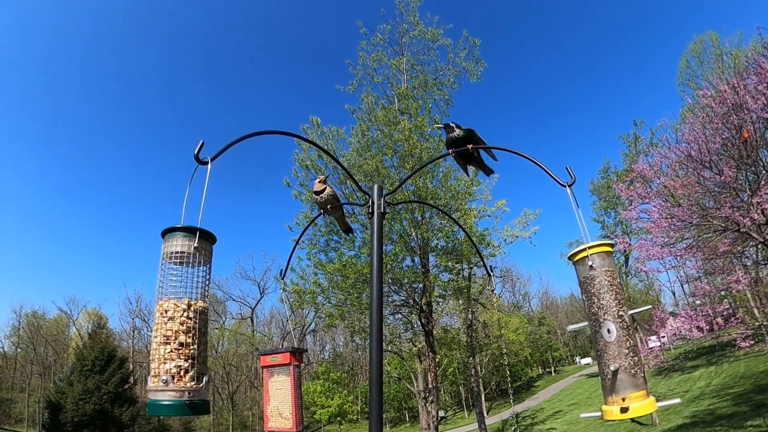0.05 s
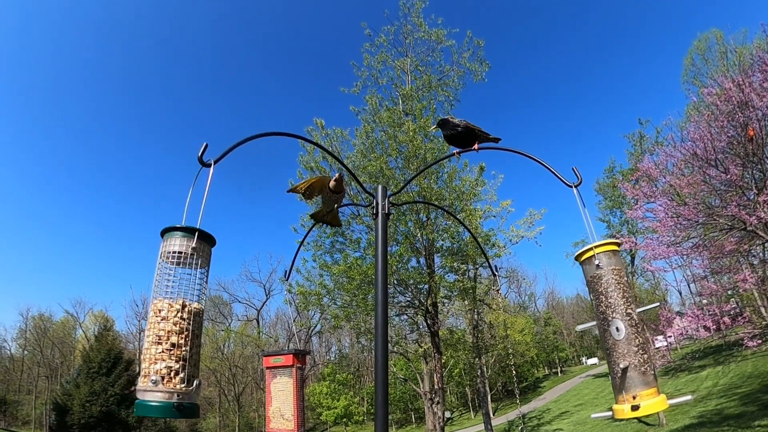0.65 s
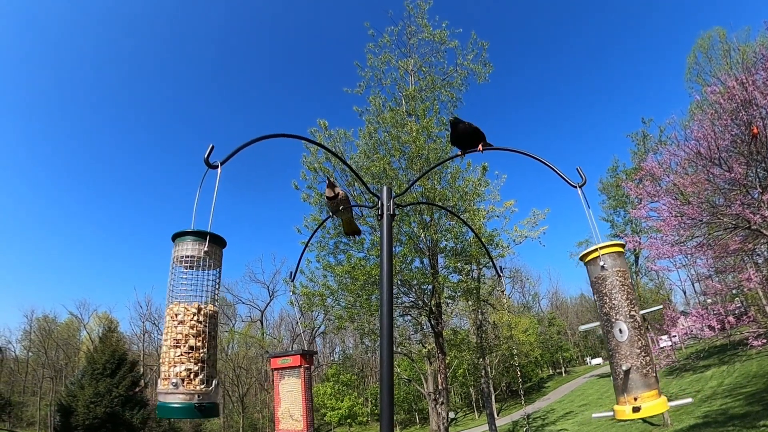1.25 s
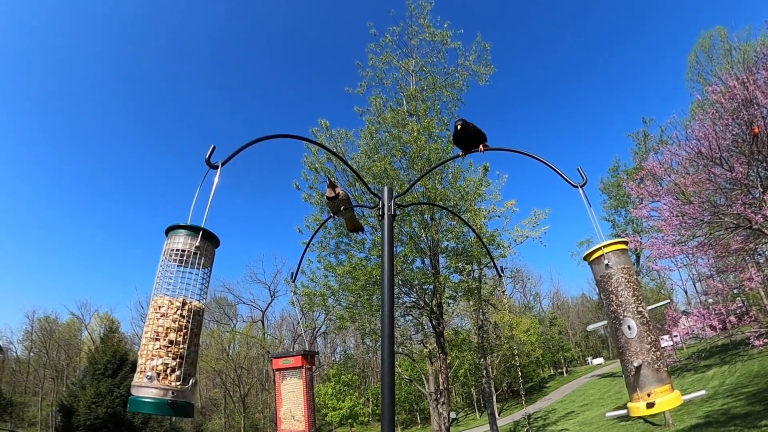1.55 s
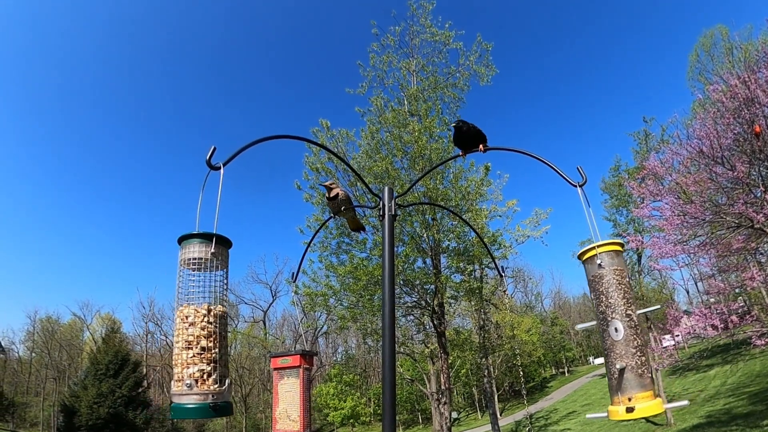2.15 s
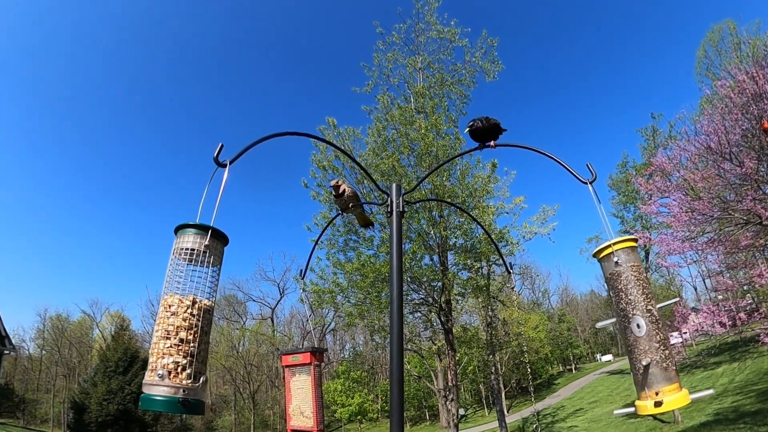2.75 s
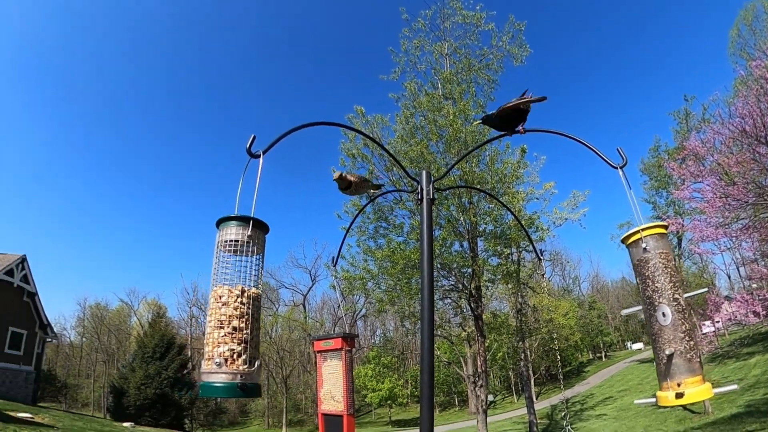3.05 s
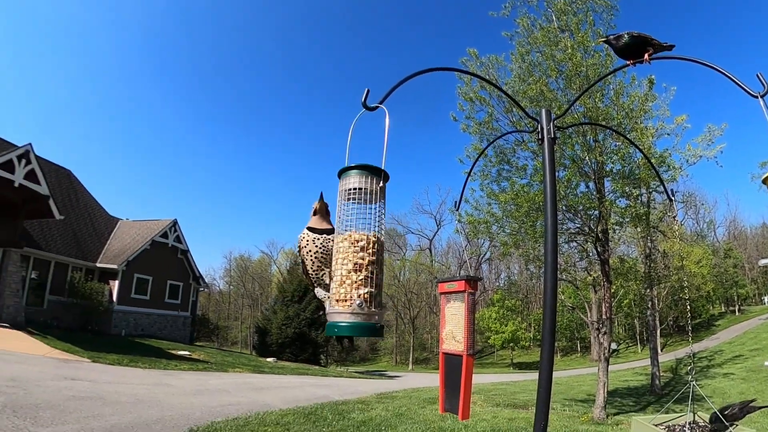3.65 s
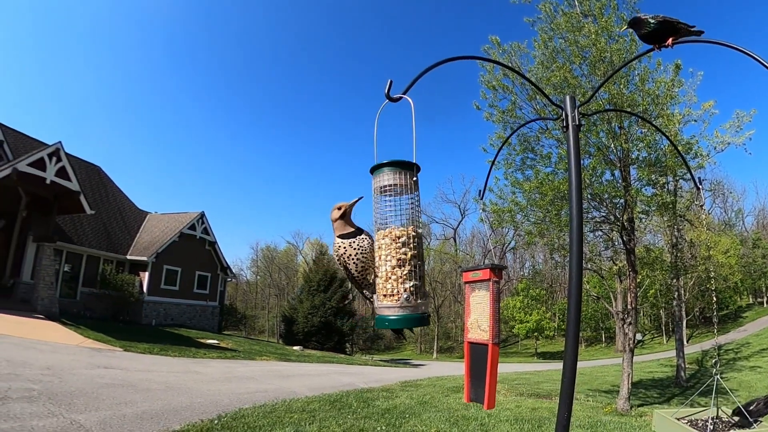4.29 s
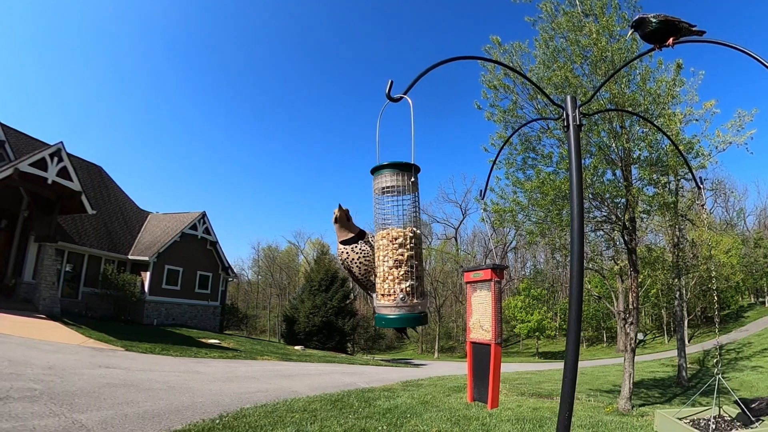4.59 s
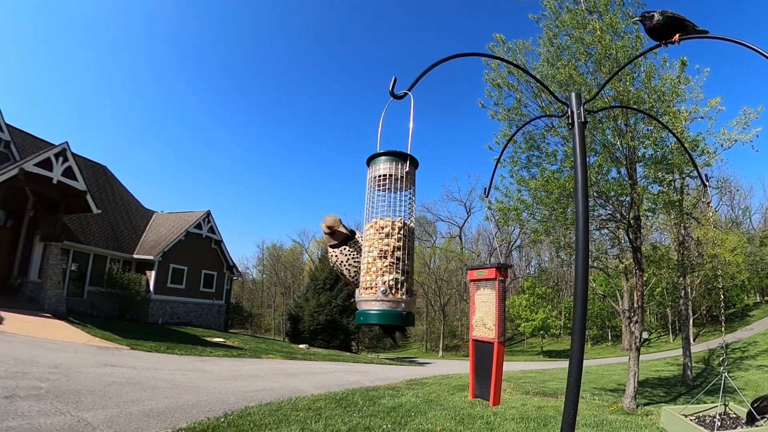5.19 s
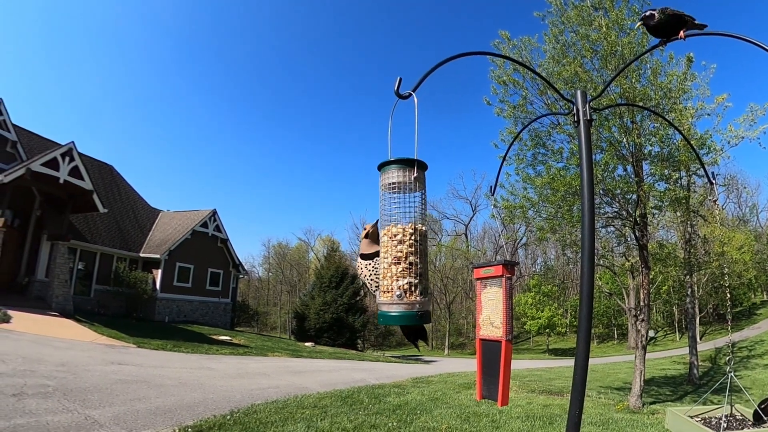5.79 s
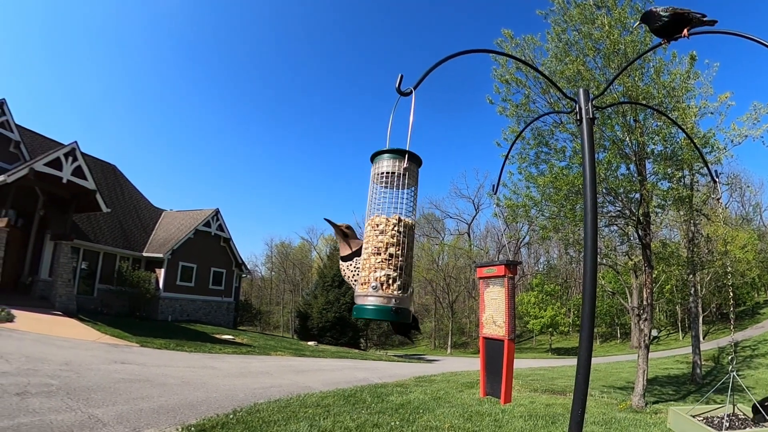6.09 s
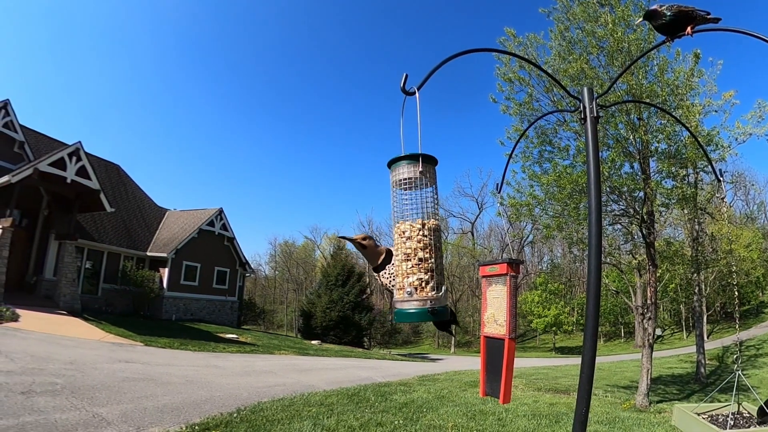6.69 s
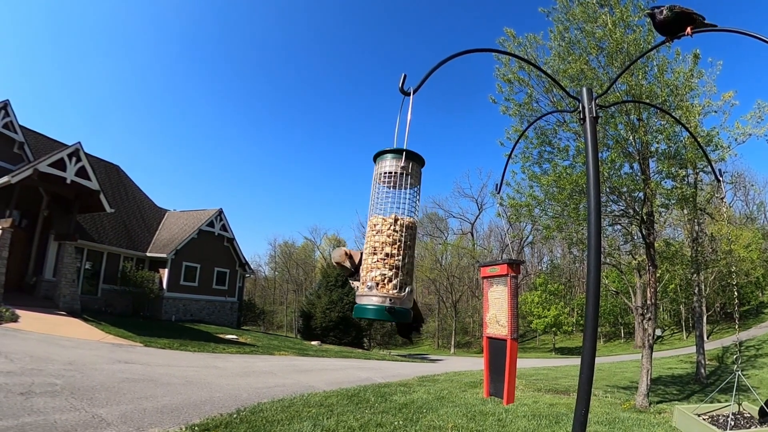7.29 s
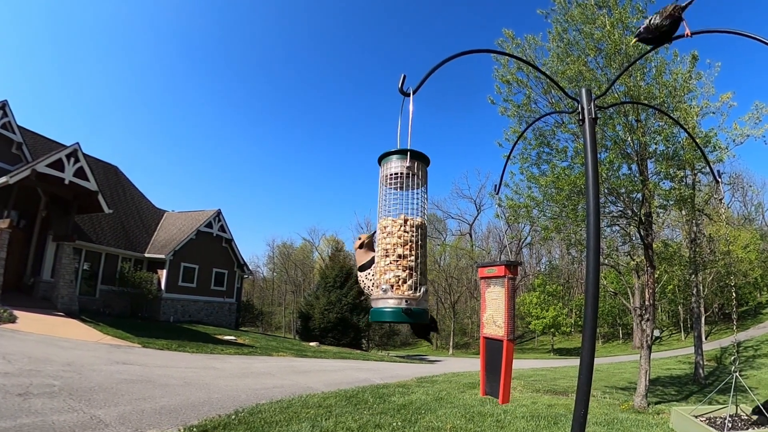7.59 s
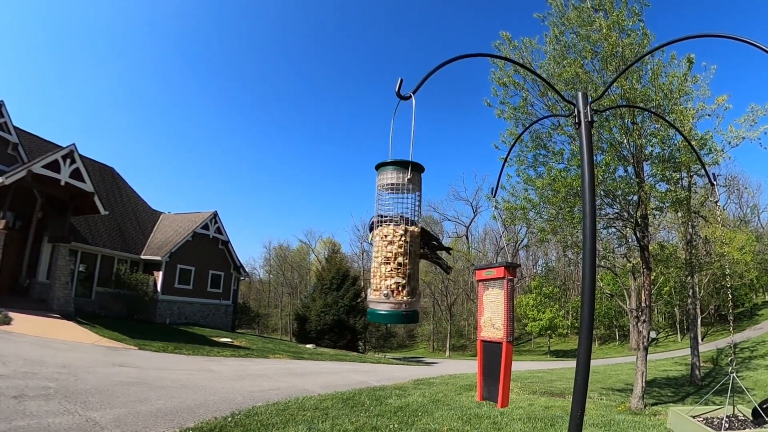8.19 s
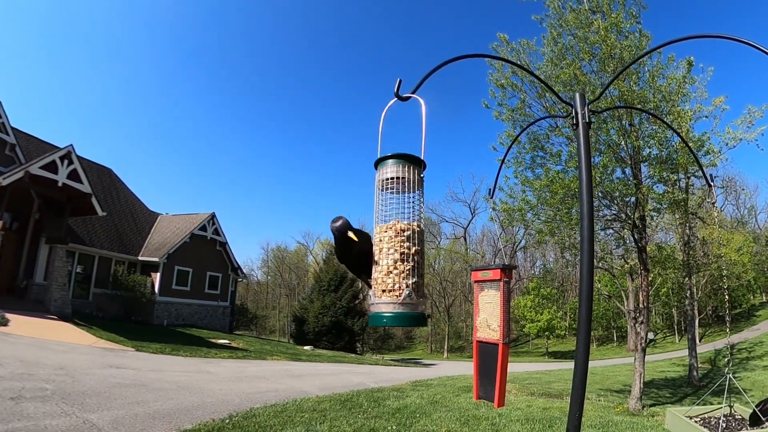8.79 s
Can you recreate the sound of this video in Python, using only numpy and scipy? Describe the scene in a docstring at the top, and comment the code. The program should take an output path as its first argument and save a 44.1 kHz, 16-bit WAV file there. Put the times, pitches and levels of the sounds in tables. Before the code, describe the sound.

A small songbird sings two quick phrases in a garden, while close wings flutter and claws tick on a feeder.

```python
"""A garden bird feeder on a spring day. A small songbird whistles two phrases of slurs, buzzes and
trills with both sides of its syrinx; they echo off house and trees. A starling lands on the steel
hanger, ringing it, and squawks in rough harmonics. Wings swish and push air close by; claws and beaks
tick on the feeder. Other birds call farther off, over a distant engine hum and light air."""
import sys
import numpy as np
from scipy import signal
from scipy.fft import rfft, irfft
from scipy.io import wavfile

SR = 44100
rng = np.random.default_rng(int(sys.argv[2]) if len(sys.argv) > 2 else 0)


def materialize(psi):
    """Save the field psi as 16-bit PCM at rate SR to the path in sys.argv[1].

    A 1-D psi becomes a single channel; in a 2-D psi each row is a channel.
    """
    bounded = np.clip(np.atleast_2d(psi).T, -1, 1)
    quanta = np.round(bounded * 32767).astype(np.int16)
    wavfile.write(sys.argv[1], SR, quanta)


N = 389844
TIME_S = np.arange(N) / SR
CUTOFF_HZ = 15300

# Levels in the tables are relative; the functions set the final gain.
# noise spectra: freq_hz, density_db
AIR_SPECTRUM = [(15, -12.5), (25, -9), (48, 0.5), (92, -8.5), (180, 2), (252, -6), (337, -8.5), (371, -9.5),
                (587, -15), (927, -25.5), (1180, -23.5), (3090, -34), (5130, -35.5), (7910, -32),
                (10300, -46.5), (17400, -120)]
DRAUGHT_SPECTRUM = [(8.8, -34.5), (15, 6.5), (42, -7), (76, -6.5), (103, -22.5), (162, -14), (258, -35),
                    (616, -56.5), (700, -53), (910, -74.5), (1540, -120)]
FEATHER_SPECTRUM = [(150, 6.5), (350, 4), (700, -4), (1400, 1.5), (2500, -2), (5000, -6), (8000, -7.5),
                    (10000, -18), (14000, -39)]
THUD_SPECTRUM = [(40, -11), (90, 4), (200, -6.5), (450, -17.5), (1000, -32), (4000, -82)]
# level curves: time_s, level_db
BREEZE_LEVEL = [(3.8, -74.5), (6.26, -56), (7.35, -41.5), (7.44, -45.5), (7.8, -46.5)]
ENGINE_FIRING_LEVEL = [(3.8, -61), (4.92, -55), (5.42, -60.5), (5.5, -53), (6.11, -46), (7.0, -51.5),
                       (7.08, -46), (7.68, -60.5), (7.7, -57)]
ENGINE_OCTAVE_LEVEL = [(3.8, -76), (4.5, -62.5), (5, -56.5), (5.4, -64), (6.1, -70.5), (6.6, -65.5),
                       (7.35, -56.5), (7.6, -61), (7.8, -79)]
CHATTER_LEVEL = [(0, -78), (.6, -67), (1.1, -62.5), (1.6, -91), (3, -68.5), (4.5, -65), (5.3, -61.5),
                 (6.2, -69), (6.9, -77.5), (8.84, -77)]
# envelope of the garden's scattered echoes: delay_s, level_db
ECHO_ENVELOPE = [(.003, 13), (.012, 1), (.06, -12.5), (.088, 0), (.11, -9), (.15, -14), (.35, -27),
                 (.8, -59)]

# syllable paths by name, then those of the syrinx's other side: time_s, pitch_hz, level_db
SYLLABLES = { "tink": [(0, 5040, -7), (.006, 5120, 1), (.016, 4300, -12.5)], "dip": [(0, 3110, -1.5),
             (.011, 2722, 8), (.025, 2450, 1), (.04, 2334, 3)], "slur": [(0, 5230, -43), (.013, 5450, -25),
             (.022, 4640, -8), (.032, 3743, -4), (.047, 3350, -9), (.063, 3140, -21.5)],
             "buzz": [(0, 5346, -18), (.012, 5486, -8.5), (.032, 7230, -3.5), (.048, 6206, -3),
             (.063, 4970, 1), (.08, 4277, -1.5), (.095, 3850, -8), (.109, 3773, -6.5), (.116, 3800, -56)],
             "cut buzz": [(0, 5600, -14), (.012, 5530, -2), (.028, 6930, 0.5), (.044, 6730, 2),
             (.06, 5000, 2), (.074, 4420, -0.5), (.084, 3167, -19)], "lift": [(0, 3815, -17.5),
             (.012, 4007, -6.5), (.028, 4353, -3), (.04, 4574, 1), (.048, 4650, -6.5), (.053, 4380, -19)],
             "low note": [(0, 2834, -10.5), (.012, 3026, -9.5), (.034, 2980, -4.5), (.043, 2820, -7)],
             "swell": [(0, 2806, -21.5), (.012, 3574, -8.5), (.025, 4014, -3), (.045, 4330, -1),
             (.075, 4450, -3.5), (.082, 4256, -12.5), (.088, 4480, -13.5)], "drop": [(0, 7700, -21.5),
             (.002, 8440, 2), (.006, 7190, -6), (.012, 6160, 1.5), (.022, 5710, 1.5), (.032, 5560, -4.5),
             (.046, 4800, -20)], "sweep": [(0, 2570, -35.5), (.008, 3820, -13.5), (.014, 4947, -3),
             (.028, 6050, -5.5), (.04, 6950, -5), (.047, 7020, -9.5), (.057, 8500, -17)],
             "fall": [(0, 5736, -5), (.008, 4900, 1), (.025, 4250, -1.5), (.04, 3650, -2.5),
             (.056, 2964, -12)], "twang": [(0, 5120, -24), (.005, 6650, -16), (.008, 6570, -2.5),
             (.014, 7130, -13), (.022, 6178, -4), (.034, 6066, -5), (.045, 5780, -17.5)],
             "chip": [(0, 2360, -28), (.006, 4025, 0.5), (.01, 5190, -7), (.015, 4380, 0.5),
             (.024, 4100, 0.5), (.031, 3640, -21)], "far rise": [(0, 3310, -8.5), (.012, 4040, -6),
             (.027, 5100, -7)], "far fall": [(0, 4660, -17.5), (.02, 3787, -6.5), (.045, 3100, -2)],
             "far tick": [(0, 4564, 0.5), (.014, 3480, 2), (.03, 2850, 2.5)]}
SECOND_VOICE = { "slur": [(0, 3840, -28), (.014, 3830, -20), (.026, 3750, -11.5)],
                "chip": [(-.002, 3330, -27), (.002, 4790, -7), (.005, 5800, -23)],
                "sweep": [(0, 4680, -12.5), (.007, 7260, -18.5), (.012, 9500, -22)],
                "fall": [(.015, 3315, -19.5), (.035, 3130, -7.5), (.05, 2750, -12), (.059, 2500, -32.5)]}
# fast pitch warble by syllable: time_s, depth_hz, rate_hz
WARBLES = { "buzz": [(0, 981, 116.3), (.008, 1250, 105.2), (.02, 774, 131.2), (.035, 550, 168.9),
           (.07, 380, 186), (.11, 240, 190.4)], "cut buzz": [(0, 1253, 112), (.008, 1400, 106),
           (.02, 800, 135), (.045, 550, 185), (.06, 50, 183.2)], "twang": [(0, 1300, 59), (.006, 1510, 105),
           (.016, 1390, 111.4), (.023, 400, 125.6), (.032, 79.6, 150)]}
# runs of one syllable: start_s, syllable, repeats, period_s, first_db, settled_db, length_ratio
FAR_SONG = [ (.966, "far rise", 5, .0705, -52.5, -52, .9), (1.078, "far rise", 4, .0715, -56, -57.5, .9),
            (1.376, "far rise", 1, 0, -58.5, -59, 0.85), (5.775, "far fall", 3, .16, -67, -53, .86),
            (6.86, "far fall", 1, 0.0037, -69, -70, 0.8)]
FAR_TRILL = [(4.531, "far tick", 15, .0686, -65, -64.5, 0.88)]
NEAR_SONG = [ (2.055, "tink", 1, 0, -50, -51, .95), (2.06, "dip", 1, 0, -60.5, -57, 0.96),
             (2.168, "slur", 2, .141, -36, -32, .97), (2.449, "buzz", 3, .228, -38, -29.5, 1),
             (2.587, "lift", 3, .23, -35, -27.5, .95), (3.144, "cut buzz", 1, 0, -32.5, -28, 1.045),
             (3.22, "low note", 3, .246, -41.5, -37, .9), (3.297, "swell", 2, .246, -28, -29.5, 1.074),
             (3.433, "drop", 2, .251, -36.5, -32, 0.94), (3.791, "sweep", 5, .0897, -31.5, -30, 1),
             (4.29, "fall", 2, .113, -40, -41, 1.02), (6.897, "tink", 1, 0, -61.5, -60.5, 0.99),
             (6.903, "dip", 1, 0, -63.5, -63, .855), (7.011, "slur", 2, .142, -39, -35, 0.98),
             (7.305, "twang", 5, .1358, -39, -29, 1.06), (7.374, "chip", 5, .1361, -36, -32, 0.85),
             (8.018, "fall", 3, .1072, -32.5, -37, 1.05), (8.384, "buzz", 2, .224, -33, -30.5, 1.033),
             (8.523, "lift", 2, .24, -32, -32, 0.98)]
# thin far whistles, one path each: time_s, pitch_hz, level_db
FAR_WHISTLES = [
    [(4.31, 7600, -57), (4.6, 7620, -61), (4.88, 7640, -59.5)],
    [(4.88, 2000, -72.5), (5, 2133, -67), (5.08, 2177, -66), (5.16, 2105, -74.5), (5.35, 2150, -83)],
    [(5.17, 9850, -76), (5.5, 9600, -71), (5.8, 9450, -73)],
    [(5.775, 6980, -74), (5.81, 6440, -67), (5.845, 6800, -72.5), (5.875, 6490, -74), (5.91, 6800, -70)],
    [(6.12, 6620, -67), (6.16, 6370, -56), (6.25, 6300, -65.5), (6.31, 6470, -78)],
    [(6.33, 5870, -71), (6.42, 5580, -73.5), (6.5, 5570, -72)],
    [(4.865, 2975, -63), (4.89, 3310, -55), (4.92, 3400, -63)],
    [(6.68, 3090, -83), (6.72, 3310, -57), (6.76, 3400, -88.5)],
]
# husky far calls: start_s, length_s, centre_hz, width_hz, level_db
HUSKY_CALLS = [(4.463, 0.41, 6090, 1800, -69.5), (6.096, 0.18, 6500, 1200, -64.5),
               (6.325, 0.18, 5530, 900, -68.5), (6.57, 0.11, 6220, 1410, -68)]
# paths of the starling's voice and whistle: time_s, pitch_hz, level_db
SQUAWK_VOICE = [(.726, 509, -48.5), (.745, 681, -50), (0.779, 723, -48.5), (.82, 762, -46.5),
                (0.864, 850, -40.5), (0.897, 897, -41.5), (0.915, 916, -47.5), (0.933, 886, -38)]
SQUAWK_WHISTLE = [(0.725, 5000, -42.5), (0.751, 5510, -48.5), (0.781, 6000, -44), (0.819, 6340, -44.5),
                  (.865, 6940, -49.5), (0.904, 7320, -48)]
# harmonics of that voice: multiple, level_db
SQUAWK_HARMONICS = [(3, -16), (4, -12), (5, -31), (6, 0.5), (7, -9.5), (8, -34), (9, -27.5), (10, -30)]

# beak among the nuts: start_s, length_s, level_db
RUMMAGES = [(0.502, 0.3, -75), (5.078, 0.082, -68), (5.532, 0.058, -56.5), (5.65, 0.1, -67),
            (6.078, 0.093, -67.5)]
# claws and beaks on the feeder: start_s, crack_db, knock_db
TAPS = [(0.1108, -50, -50), (0.1373, -48, -51.5), (0.177, -47, -56), (0.2224, -53, -52),
        (0.2362, -47.5, -55), (0.5751, -55.5, -63), (0.7068, -52, -73), (1.3249, -65.5, -68),
        (3.6371, -55, -49.5), (4.4825, -55.5, -66), (5.172, -54, -59), (5.548, -34, -60), (5.565, -53, -66),
        (5.5927, -36.5, -43.5), (5.608, -53, -53), (5.9354, -57, -63), (7.9976, -35, -39),
        (8.029, -36, -56), (8.0806, -39, -30), (8.266, -35, -52), (8.4742, -32.5, -44.5),
        (8.5672, -41, -61), (8.7719, -46, -52.5)]
# feeder resonances: freq_hz, width_hz, gain_db
FEEDER_MODES = [(1250, 900, -51), (1900, 450, -33), (3300, 500, 8.5), (5100, 610, 8.5), (5834, 490, 12.5),
                (6800, 470, 11), (8085, 740, 4.5), (10460, 1100, -12)]
# claws on the hanger: start_s, level_db
CLAW_STRIKES = [(0.111, -53), (0.14, -55), (0.178, -54), (0.235, -42.5)]
# steel hanger modes: freq_hz, level_db, nominal_t60_s
HANGER_MODES = [(1480, -23, 0.56), (1665, -14, 0.33), (1820, -14.5, 0.32), (2492, -17, 0.3),
                (2960, -5.5, 0.13), (3060, -4, 0.085), (3400, -8, 0.12), (4005, -13, 0.152),
                (4760, -1, 0.12), (5050, 10, 0.037), (5300, -17, 0.046), (5750, -16, 0.264),
                (7400, -15, 0.088), (8300, -26, 0.092), (9800, -29, 0.087)]
# birds landing, shifting, taking off: start_s, length_s, draught_db, rustle_db
FLURRIES = [(.01, 0.042, -36.5, -58), (0.098, 0.22, -65, -57), (0.538, 0.17, -51, -66),
            (0.74, 0.011, -59, -54), (0.9, 0.036, -73, -63), (3.053, 0.14, -48, -61.5),
            (3.345, 0.13, -36, -55), (3.518, 0.075, -46, -54.5), (5.518, 0.12, -48, -64),
            (7.897, 0.043, -42.5, -60), (7.98, 0.1, -23, -43.5), (8.24, 0.14, -29.5, -52),
            (8.464, 0.088, -30, -47), (8.73, 0.18, -38, -54)]
# close wingbeats: centre_s, swish_db, push_db, thud_db
WINGBEATS = [(0.036, -46.5, -36, -54.5), (1.89, -85, -48, -76), (3.382, -62, -57, -43.5),
             (3.457, -42, -44, -37.5), (3.527, -59, -43, -60), (3.598, -53.5, -38, -55),
             (7.951, -37.5, -34, -41), (8.011, -33, -26, -30), (8.068, -37, -37, -28.5),
             (8.14, -45, -30.5, -43.5), (8.205, -43.5, -22, -55), (8.278, -42, -23, -37),
             (8.318, -62, -21, -36.5), (8.354, -43.5, -24.5, -41), (8.442, -42, -27, -41.5),
             (8.518, -43.5, -25.5, -34.5), (8.71, -39, -21, -45), (8.794, -41.5, -22.5, -44)]


def from_db(db):
    """Decibels to gain."""
    return 10 ** (np.asarray(db) / 20)


def unit_rms(x):
    """Scale to unit power."""
    return x / np.sqrt(np.mean(x ** 2) + 1e-20)


def along(curve, time_s):
    """Each value column of a curve, interpolated at time_s."""
    knots_s, *columns = np.transpose(curve)
    return [np.interp(time_s, knots_s, column) for column in columns]


def add(out, start_s, sound):
    """Mix a sound in at start_s."""
    at = max(0, round(start_s * SR))
    out[at:at + len(sound)] += sound[:max(0, N - at)]


def drift(knots_per_s, size=N):
    """Random wander with a spread of about 1."""
    knots = rng.standard_normal(4096)
    return 1.2 * np.interp(np.arange(size) / SR * knots_per_s % 4095, np.arange(4096), knots)


def noise(spectrum, lowest_hz=12):
    """Unit-power noise with the given spectrum."""
    freq_hz, density_db = np.transpose(spectrum)
    bins_hz = np.maximum(np.fft.rfftfreq(N, 1 / SR), 1)
    gain = from_db(np.interp(np.log(bins_hz), np.log(freq_hz), density_db)) * (bins_hz > lowest_hz)
    return unit_rms(irfft(rfft(rng.standard_normal(N)) * gain, N))


def resonate(x, freq_hz, width_hz):
    """Two-pole resonance, peak gain 1."""
    radius = np.exp(-np.pi * width_hz / SR)
    numerator = np.array([1, 0, -1]) * (1 - radius ** 2) / 2
    denominator = [1, -2 * radius * np.cos(2 * np.pi * freq_hz / SR), radius ** 2]
    return signal.lfilter(numerator, denominator, x + 1e-18)


def band(x, centre_hz, width_hz):
    """Two equal resonances in series, scaled to unit power."""
    return unit_rms(resonate(resonate(x, centre_hz, width_hz), centre_hz, width_hz))


def syrinx(path, warble=None, stretch=1, jitter=.00384, shimmer_db=1.36, harmonics=((1, 0), (2, -54)),
           throat_hz=6845, throat_db_per_octave=61.5, fade_s=.002):
    """One side of a syrinx: a tone along a pitch path. The throat passes high notes poorly."""
    first_s, last_s = path[0][0], path[-1][0]
    time_s = np.arange(first_s, last_s, 1 / (SR * stretch))
    pitch_hz, level_db = along(path, time_s)
    if warble:
        depth_hz, rate_hz = along(warble, time_s)
        pitch_hz -= depth_hz * np.cos(2 * np.pi * np.cumsum(rate_hz) / SR)
    pitch_hz *= 1 + jitter * drift(700, len(time_s))
    level_db -= throat_db_per_octave * np.clip(np.log2(pitch_hz / throat_hz), 0, .25)
    level_db += shimmer_db * drift(300, len(time_s))
    phase = 2 * np.pi * np.cumsum(pitch_hz) / SR
    tone = sum(from_db(db) * np.sin(k * phase) * (k * pitch_hz < CUTOFF_HZ) for k, db in harmonics)
    fade = np.clip(np.minimum(time_s - first_s, last_s - time_s) / fade_s, 0, 1)
    return np.sqrt(2) * tone * fade * from_db(level_db)


def sing(song, slowing_s=0, settling_ratio=.23):
    """Each run repeats a learnt syllable and settles in level; each gap grows by slowing_s."""
    out = np.zeros(N)
    for start_s, name, repeats, period_s, first_db, settled_db, stretch in song:
        for k in range(repeats):
            onset_s = start_s + k * period_s + slowing_s * k * (k - 1) / 2
            gain = from_db(settled_db + (first_db - settled_db) * settling_ratio ** k)
            add(out, onset_s, gain * syrinx(SYLLABLES[name], WARBLES.get(name), stretch))
            if name in SECOND_VOICE:
                path = SECOND_VOICE[name]
                add(out, onset_s + path[0][0] * stretch, gain * syrinx(path, stretch=stretch))
    return out


def through_trees(x, direct_db, scatter_db, scatter_s):
    """Many paths of nearly equal length blur a far call's glides."""
    delay_s = np.arange(SR // 10) / SR
    response = rng.standard_normal(len(delay_s)) * np.exp(-delay_s / scatter_s)
    scattered = signal.fftconvolve(x, response / np.linalg.norm(response))[:N]
    return from_db(direct_db) * x + from_db(scatter_db) * scattered


def garden_echo(x, house_delay_s=.092, house_db=-15):
    """Trunks and leaves scatter a haze of echoes; the house wall returns one distinct repeat."""
    delay_s = np.arange(SR) / SR
    level_db, = along(ECHO_ENVELOPE, delay_s)
    reflections = rng.standard_normal(SR) * (rng.random(SR) < .03)
    response = reflections * from_db(level_db) * (delay_s > .002)
    response /= np.linalg.norm(response)
    add(response, house_delay_s, from_db([house_db]))
    return signal.fftconvolve(x, response)[:N]


def air(level_db=-60):
    """Steady outdoor hush."""
    return from_db(level_db) * noise(AIR_SPECTRUM)


def breeze(lull_db=-64, gust_db=3):
    """Light, uneven air rumbles on the microphone."""
    level_db, = along(BREEZE_LEVEL, TIME_S)
    return from_db(np.maximum(level_db, lull_db) + gust_db * drift(8)) * noise(DRAUGHT_SPECTRUM)


def engine(firing_hz=162.4, wander=.0016, approach_db_per_s=4.5):
    """Distant engine: only the firing tone and its octave carry this far."""
    firing_db, = along(ENGINE_FIRING_LEVEL, TIME_S)
    octave_db, = along(ENGINE_OCTAVE_LEVEL, TIME_S)
    approach_end_s = ENGINE_FIRING_LEVEL[0][0]
    approach = from_db(approach_db_per_s * np.minimum(TIME_S - approach_end_s, 0))
    phase = 2 * np.pi * np.cumsum(firing_hz * (1 + wander * drift(9))) / SR
    hum = from_db(firing_db) * np.sin(phase) + from_db(octave_db) * np.sin(2 * phase)
    return np.sqrt(2) * approach * hum


def wood_chatter(calls_per_s=35, spread_db=8, candidates=500):
    """Many birds deep in the wood: syllables at random moments, each transposed its own way."""
    out = np.zeros(N)
    paths = [SYLLABLES[name] for name in ("far rise", "far fall", "far tick", "lift")]
    for when, kind, pitch, weakness, chance in rng.random((candidates, 5)):
        if chance < calls_per_s * N / SR / candidates:
            start_s = when * N / SR
            path = np.array(paths[int(kind * len(paths))]) * [1, .8 + .4 * pitch, 1]
            level_db, = along(CHATTER_LEVEL, start_s)
            add(out, start_s, from_db(level_db - spread_db * weakness) * syrinx(path))
    return out


def far_birds():
    """Short runs of notes, thin wavering whistles and husky calls of band noise."""
    out = sing(FAR_SONG, slowing_s=.0033)
    for path in FAR_WHISTLES:
        add(out, path[0][0], syrinx(path, jitter=.0074, shimmer_db=3))
    for start_s, length_s, centre_hz, width_hz, level_db in HUSKY_CALLS:
        rasp = band(rng.standard_normal(int(length_s * SR)), centre_hz, width_hz)
        add(out, start_s, from_db(level_db) * rasp * signal.windows.tukey(len(rasp)))
    return out


def rummage(grain_db=5):
    """Dry husks rub under a beak in clumps of tiny bright grains."""
    envelope = np.zeros(N)
    for start_s, length_s, level_db in RUMMAGES:
        add(envelope, start_s, from_db(level_db) * signal.windows.tukey(int(length_s * SR)))
    grains = rng.standard_normal(N) * from_db(grain_db * drift(250))
    return envelope * band(grains, centre_hz=7000, width_hz=3500)


def feeder_taps(crack_s=.0015, rattle_s=.0081, rattle_db=-17, knock_s=.0025, gain_db=4):
    """Each contact drives the feeder's resonances with a crack and a short rattle, over a dull knock."""
    force_envelope, knock_envelope = np.zeros((2, N))
    age_s = np.arange(SR // 10) / SR
    contact = np.exp(-age_s / crack_s) + from_db(rattle_db) * np.exp(-age_s / rattle_s)
    for start_s, crack_db, knock_db in TAPS:
        add(force_envelope, start_s, from_db(crack_db) * contact)
        add(knock_envelope, start_s, from_db(knock_db) * np.exp(-age_s / knock_s))
    force = force_envelope * rng.standard_normal(N)
    ring = sum((-1) ** k * from_db(mode_db) * resonate(force, freq_hz, width_hz)
               for k, (freq_hz, width_hz, mode_db) in enumerate(FEEDER_MODES))
    knock = knock_envelope * unit_rms(resonate(rng.standard_normal(N), freq_hz=590, width_hz=1100))
    return from_db(gain_db) * (ring + knock)


def hanger(gain_db=-2, damping_ratio=.83, spread_db=2):
    """Each claw strike rings the steel bar's modes, each at a random strength."""
    out = np.zeros(N)
    age_s = np.arange(SR) / SR
    freq_hz, mode_db, nominal_t60_s = np.transpose(HANGER_MODES)[:, :, None]
    t60_s = nominal_t60_s / damping_ratio
    modes = from_db(mode_db - 60 * age_s / t60_s) * np.sin(2 * np.pi * freq_hz * age_s)
    for start_s, level_db in CLAW_STRIKES:
        strengths = from_db(level_db + gain_db + spread_db * rng.standard_normal(len(modes)))
        add(out, start_s, strengths @ modes)
    return out


def wings(attack_s=.029, release_s=.034, swish_s=.011, push_s=.011, thud_s=.014, grain_db=3):
    """Each beat swishes, thuds and pushes air; through a flurry feathers rustle and the air eddies."""
    feather_envelope, draught_envelope, thud_envelope, push = np.zeros((4, N))
    for start_s, length_s, draught_db, rustle_db in FLURRIES:
        rise = (TIME_S - start_s) / attack_s
        fall = (start_s + length_s - TIME_S) / release_s
        swell = np.exp(np.clip(np.minimum(rise, fall), -20, 0))
        draught_envelope += from_db(draught_db - 2) * swell
        feather_envelope += from_db(rustle_db - 3) * swell
    for centre_s, swish_db, push_db, thud_db in WINGBEATS:
        near = np.abs(TIME_S - centre_s) < 10 * thud_s
        offset_s = TIME_S[near] - centre_s
        pulse = 2 * offset_s / push_s * np.exp(-(offset_s / push_s) ** 2)   # suction, then pressure
        push[near] += from_db(push_db + 3) * pulse
        feather_envelope[near] += from_db(swish_db - 6) * np.exp(-np.abs(offset_s) / swish_s)
        thud_envelope[near] += from_db(thud_db) * np.exp(-(offset_s / thud_s) ** 2)
    feathers = feather_envelope * noise(FEATHER_SPECTRUM) * from_db(grain_db * drift(400))
    thuds = thud_envelope * noise(THUD_SPECTRUM)
    draught = draught_envelope * noise(DRAUGHT_SPECTRUM)
    return feathers + push + thuds + draught


def starling(rasp_db=-8, rasp_band_hz=(200, 800), release_s=.018):
    """A rising harmonic voice and an unrelated whistle, both roughened by irregular vibration."""
    out = np.zeros(N)
    voice = syrinx(SQUAWK_VOICE, jitter=.0052, shimmer_db=.5, harmonics=SQUAWK_HARMONICS)
    add(out, SQUAWK_VOICE[0][0], voice)
    add(out, SQUAWK_WHISTLE[0][0], syrinx(SQUAWK_WHISTLE, jitter=.0077, shimmer_db=.5))
    bandpass = signal.butter(2, rasp_band_hz, "band", fs=SR, output="sos")
    rasp = unit_rms(signal.sosfilt(bandpass, rng.standard_normal(N)))
    release = np.clip((SQUAWK_VOICE[-1][0] - TIME_S) / release_s, 0, 1)
    return out * (1 + from_db(rasp_db) * rasp) * release


def songbird():
    """Two phrases of nearly pure syllables; a fast pitch warble makes the buzzes."""
    return sing(NEAR_SONG, slowing_s=.0033)


def scene():
    """Calls and ticks echo, wings and background stay dry, the deep wood is heard by echo alone."""
    song = songbird()
    squawk = starling()
    ticks = feeder_taps() + hanger() + rummage()
    far = through_trees(far_birds(), direct_db=-.5, scatter_db=-8.5, scatter_s=.009)
    far += through_trees(sing(FAR_TRILL), direct_db=-1.5, scatter_db=-4.5, scatter_s=.035)
    wood = through_trees(wood_chatter(), direct_db=-25, scatter_db=0, scatter_s=.04)
    flaps = wings()
    echo = garden_echo(wood + from_db(-8) * (song + far) + from_db(-11) * squawk + from_db(-11.5) * ticks)
    background = air() + breeze() + engine()
    return (background + echo + far + ticks + flaps + squawk + song)[None]


def record(dry):
    """Steep low-pass on the top treble."""
    lowpass = signal.cheby2(12, 70, CUTOFF_HZ + 700, fs=SR, output="sos")
    return signal.sosfilt(lowpass, dry)


dry = scene()
out = record(dry)
materialize(out)
```